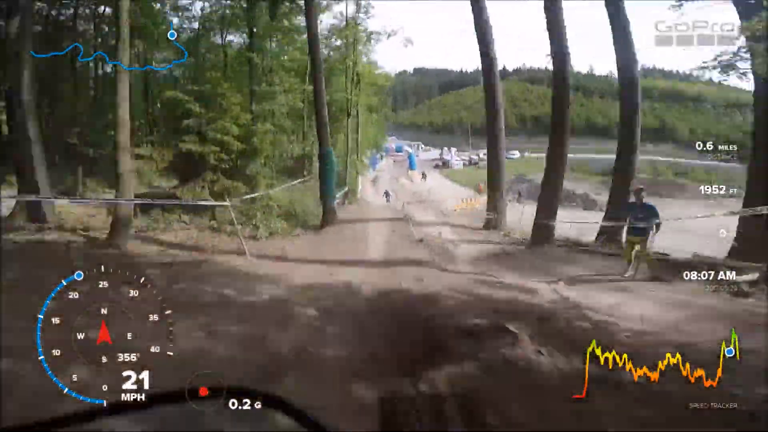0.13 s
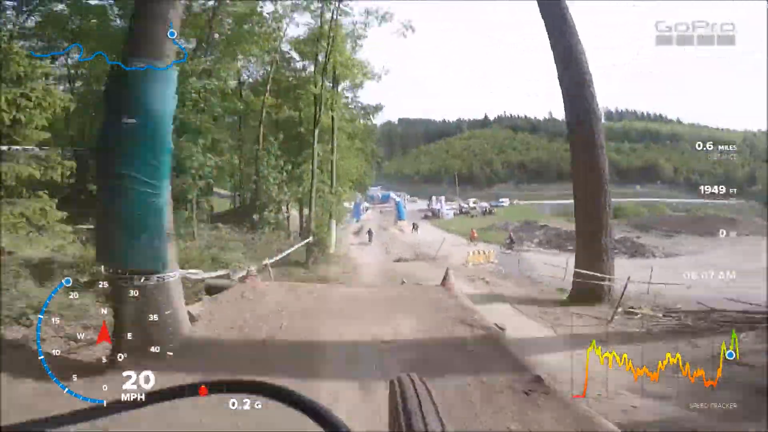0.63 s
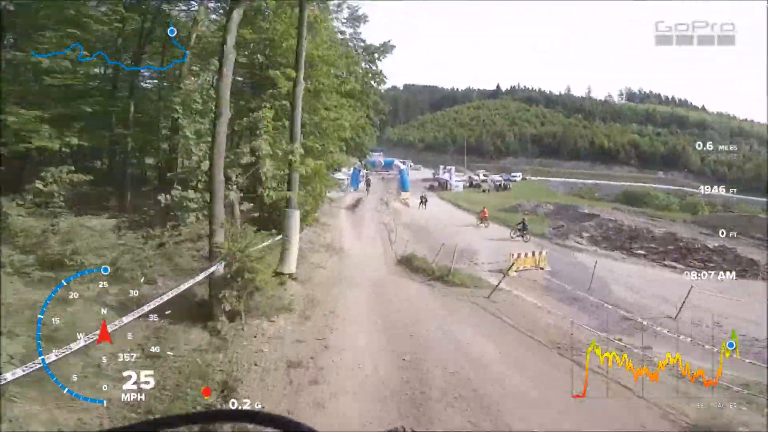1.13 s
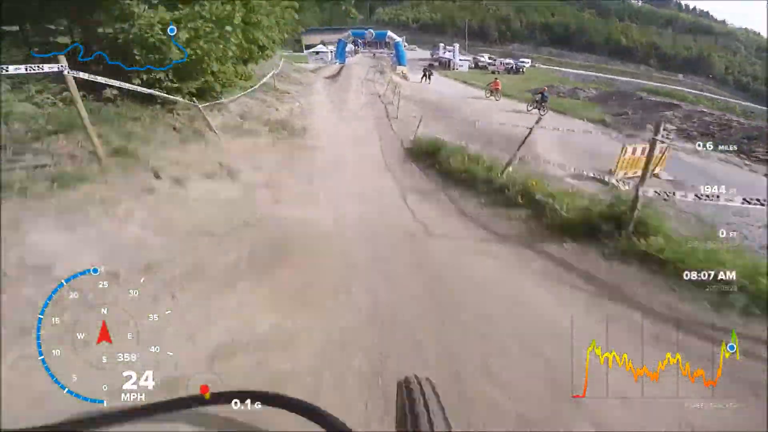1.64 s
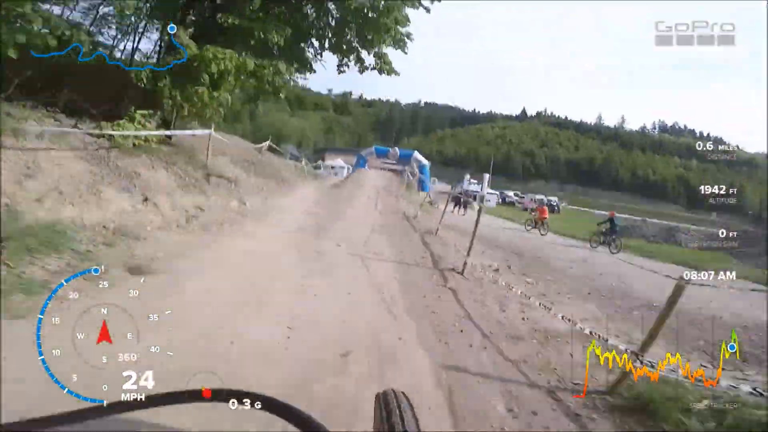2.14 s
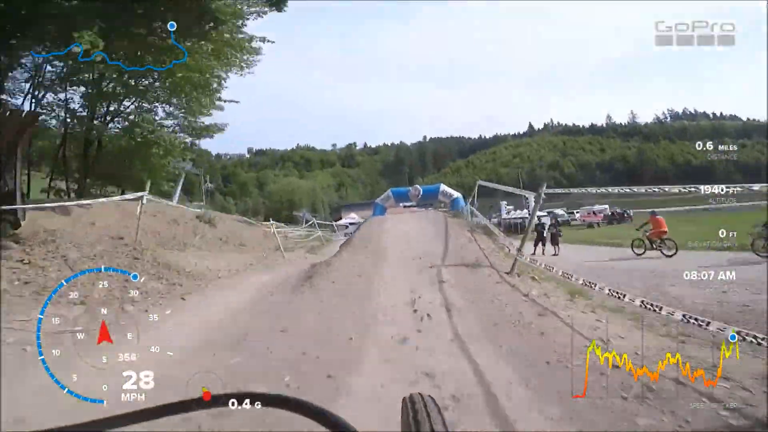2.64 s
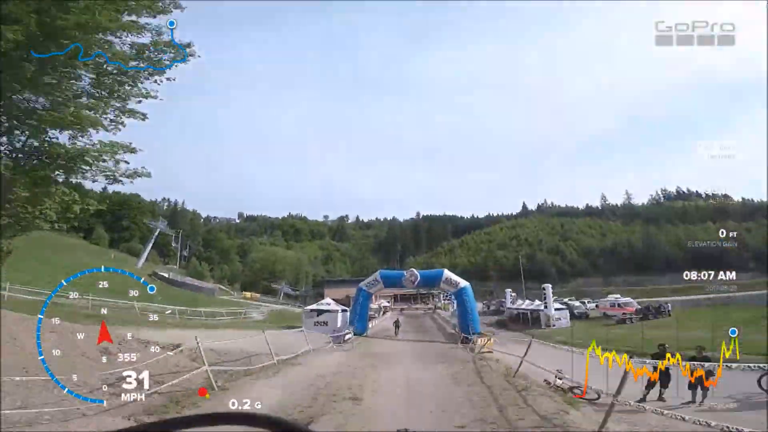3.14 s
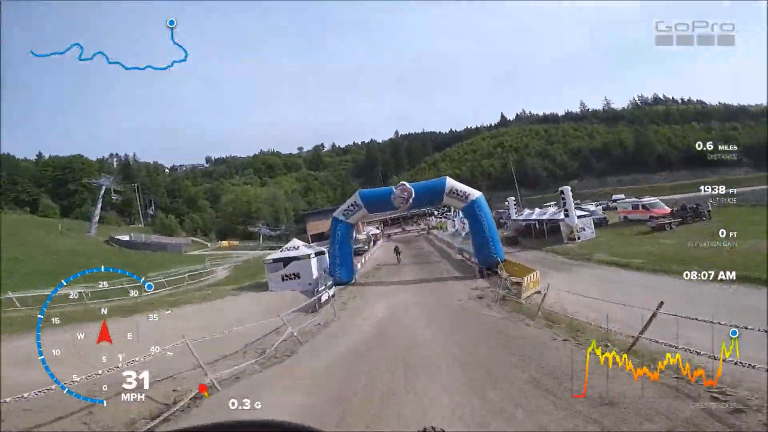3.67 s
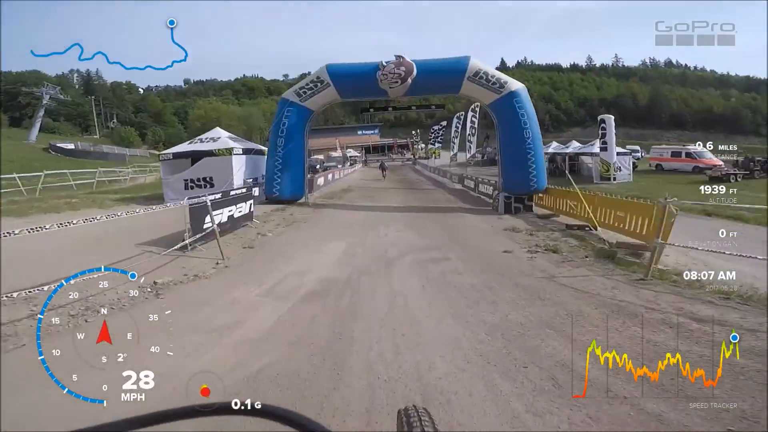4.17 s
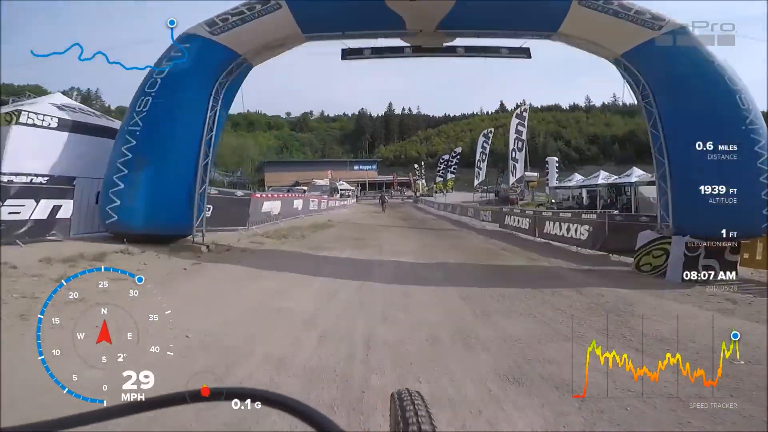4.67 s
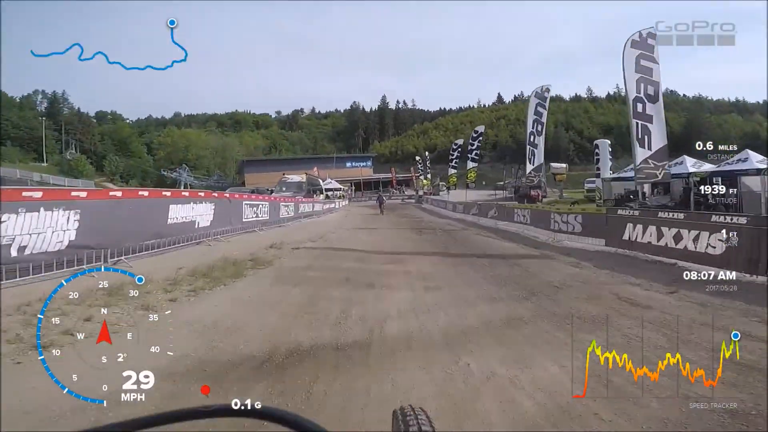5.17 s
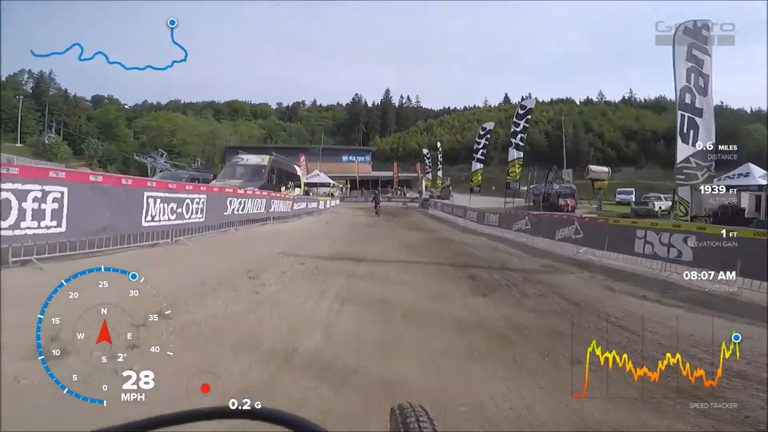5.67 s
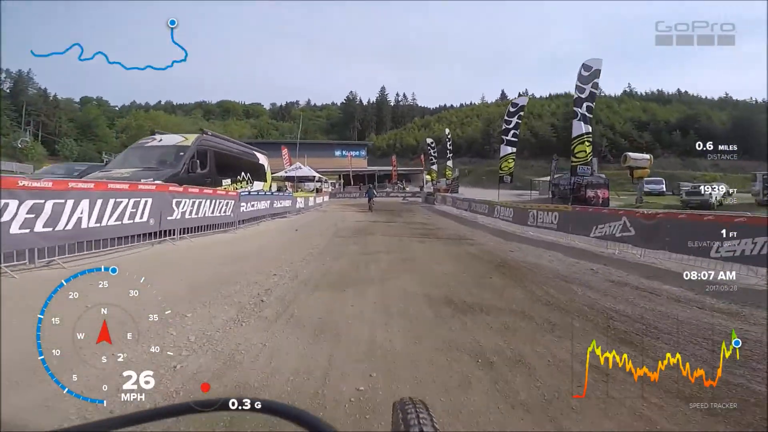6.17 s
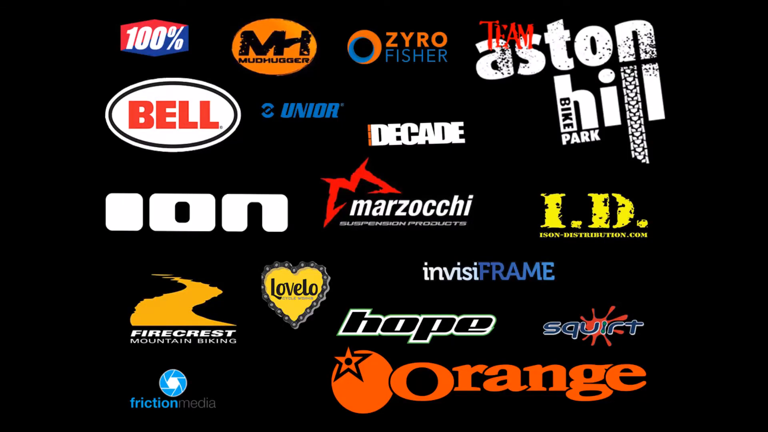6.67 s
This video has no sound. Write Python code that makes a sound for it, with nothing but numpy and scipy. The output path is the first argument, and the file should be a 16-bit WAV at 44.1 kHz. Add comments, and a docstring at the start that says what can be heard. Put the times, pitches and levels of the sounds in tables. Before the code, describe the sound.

A fast dirt-trail ride: lumpy bass wind roar, rumbling knobbly tyres, gravel chatter, ticks, two lighter airborne gaps with hard landings, abrupt click to silence.

```python
"""Deep bass buffeting leads, over drumming tyres, rattles, ticks and hissing air, on a fast dirt trail.
A small camera rides on a mountain bike: its microphone is in the wind, its housing shaken through the mount.
Noise swung around a moving centre makes the buffeting, filtered noise and clicks the tyres and air,
damped modes the blows. Twice the bike is in the air and the bass drops away; at the end the sound is cut off."""
import sys
import numpy as np
from scipy import signal
from scipy.io import wavfile
from scipy.ndimage import uniform_filter1d

SR = 44100
rng = np.random.default_rng(int(sys.argv[2]) if len(sys.argv) > 2 else 0)


def inscribe(sig):
    """Save sig as 16-bit PCM at rate SR to the path in sys.argv[1].

    A 1-D sig is mono; a 2-D sig holds one channel per row.
    Samples are clipped to [-1, 1] before scaling.
    """
    pcm = np.round(np.clip(np.atleast_2d(sig).T, -1, 1) * 32767)
    wavfile.write(sys.argv[1], SR, pcm.astype(np.int16))


def boost(x):
    """Linear amplitude factor 10**(x/20) for a level x in decibels (scalar or array-like)."""
    u = np.asarray(x, float) / 20
    return 10 ** u


N = 300175

# Levels in the tables are nominal: layer trims and the soft overload follow.
# Wheels off the trail: (take-off [s], landing [s])
JUMPS = [(1.303, 1.6), (3.42, 3.998)]
# The ride between jolts: (time [s], housing drumming [dB], overtones [dB], gravel chatter [dB], air hiss [dB])
ROLL = [(0, -26, -41, -43, -57), (0.4, -31, -40.5, -45, -53), (0.76, -32.5, -45, -47.5, -55.5),
        (0.93, -34, -43.5, -48.5, -53.5), (0.99, -34, -41.5, -52, -62.5), (1.17, -38, -49, -57, -58.5),
        (1.44, -36.5, -41, -50, -54.5), (1.59, -47.5, -49, -51, -53), (1.6, -32.5, -45.5, -43, -52.5),
        (1.87, -31, -43, -45, -52.5), (2.1, -31.5, -43, -45, -59), (2.4, -35, -43.5, -49.5, -59.5),
        (2.7, -31.5, -40, -44, -59), (3.1, -32.5, -44.5, -49.5, -59.5), (3.28, -34.5, -55, -59.5, -63),
        (3.46, -39.5, -45, -53, -60), (3.525, -36, -52, -53.5, -63), (3.56, -42, -50, -52, -59.5),
        (3.645, -52, -50.5, -54.5, -57), (3.68, -38.5, -47, -50.5, -57), (3.75, -45.5, -47, -52.5, -56.5),
        (3.985, -37, -45, -48.5, -53), (4.002, -30, -37, -38.5, -50.5), (4.3, -36.5, -41.5, -46, -56),
        (4.77, -33, -42, -47.5, -58), (5.0, -37, -42, -52, -56.5), (5.2, -27.5, -38.5, -50.5, -57.5),
        (5.38, -28, -38, -50.5, -59), (5.55, -31, -44.5, -48.5, -54.5), (6.15, -30.5, -42, -50.5, -56)]
# Roots, rocks and landings: (time of top [s], shake lift [dB], rattle lift [dB], fall [s])
JOLTS = [(0.065, 5.5, 4.5, 0.064), (0.22, 2.5, 1.5, 0.1), (0.339, 4.5, -6, 0.053), (0.474, 5.5, 9, .1),
         (0.6, 3, 9.5, 0.032), (0.702, 6.5, -3.5, 0.036), (0.882, 6, -2.5, .06), (1.615, 5, -4, 0.12),
         (1.7, 7.5, 9, 0.037), (1.735, 10.5, 18.5, .04), (1.755, 4.5, 3, 0.024), (1.938, 4.5, -2, 0.16),
         (2.11, 2.5, 3, .06), (2.22, 3.5, 4.5, 0.032), (2.499, 6, 13.5, 0.067), (2.884, 5.5, 12.5, .05),
         (3.017, 2, 10.5, 0.036), (3.414, 6.5, 10, 0.047), (4.015, 8.5, 8.5, 0.046), (4.06, 9, 12, 0.027),
         (4.224, 4, 8, 0.024), (4.366, 3.5, 4, 0.049), (4.585, 10, 20, 0.075), (4.693, 9, 18.5, 0.052),
         (4.845, 5.5, 12, 0.16), (5.07, 3, 6.5, 0.1), (5.402, 5.5, -1.5, 0.14), (5.505, 2.5, 4, 0.046),
         (5.62, 7, 18.5, 0.046), (5.677, 8, 18.5, 0.12), (5.892, 3.5, 13, 0.016), (6.144, 5.5, 12.5, 0.18)]
# Lift of each layer by the shake: layer: share [dB per dB]
SHAKE_SHARE = {"drum": 0.91, "overtones": 0.83, "chatter": 1, "hiss": 0.53}
# Treble layers at -32 dB of drumming and -47 dB of chatter: layer: (level [dB],
# slope with drumming, with chatter, with shake, with rattle [dB per dB])
TREBLE_LAWS = {"rattle": (-64.5, 0.84, 1.25, -1.41, 1.45), "grit": (-78.5, 1, 0.9, -0.8, 1)}

# Spectrum of the airstream hiss: (frequency [Hz], relative power density [dB])
AIR_COLOUR = [(880, -37), (1500, -5), (1870, -20.5), (2340, 5.5), (2750, -2.5), (3450, -14.5), (3760, -21),
              (4780, -5), (7360, -26), (9570, -65.5), (16200, -120)]
# Steady top of the hiss: (frequency [Hz], relative power density [dB])
THIN_AIR_COLOUR = [(5500, -27.5), (7000, -0.5), (7800, -0.5), (8500, 1), (9500, -6.5), (12000, -12.5),
                   (15500, -26), (17000, -79.5)]
# Breathy whistle of air over an edge: (time [s], level [dB], centre [Hz])
WHISTLE = [(0, -73.5, 4070), (0.6, -66, 4080), (0.81, -54.5, 3610), (1.18, -63, 4100), (1.38, -59, 3910),
           (1.45, -48.5, 4500), (1.5, -55, 4300), (1.8, -69, 3600), (1.92, -60, 4030), (2.15, -66.5, 3790),
           (2.79, -49.5, 4030), (3.18, -67.5, 3886), (3.47, -64, 3840), (3.53, -51.5, 3920),
           (3.6, -60, 3990), (3.95, -57, 3866), (4.22, -49, 3630), (4.36, -49, 4034), (4.86, -67, 4220),
           (5.4, -65, 3950), (5.62, -57.5, 3960), (6.1, -65, 3880)]

# Soft rumble left in the air, one list for each jump: (time [s], level [dB])
AIRBORNE = [
    [(1.3, -46), (1.326, -28.5), (1.376, -27), (1.524, -39), (1.568, -44), (1.592, -49), (1.603, -15)],
    [(3.42, -32), (3.438, -36), (3.606, -41), (3.76, -41.5), (3.79, -36), (3.872, -40), (3.904, -30),
     (3.928, -37), (3.968, -39), (4.01, -16)],
]
# Spectrum of that rumble: (frequency [Hz], relative power density [dB])
AIRBORNE_COLOUR = [(12, -45), (20, -23), (27, -10), (59, 2), (130, 0), (200, -13), (260, -28.5),
                   (440, -120)]

# Short scrapes of sand across the case: (time of top [s], level [dB], rise [s], fall [s])
SCRAPES = [(0.597, -45.5, .005, 0.011), (0.798, -56.5, 0.014, .008), (1.612, -53, 0.0085, 0.024),
           (1.657, -56, 0.0116, .015), (1.698, -52, .006, .012), (1.735, -44, 0.017, 0.016),
           (1.753, -43.5, .008, .012), (4.007, -46.5, .004, .025), (4.05, -46.5, .008, .02),
           (4.21, -48.5, 0.015, .012), (5.62, -46, .008, .012), (5.666, -39, 0.02, .012),
           (5.71, -56, .012, 0.022)]
# Spectrum of the scraping sand: (frequency [Hz], relative power density [dB])
SCRAPE_COLOUR = [(900, -30.5), (2000, -8), (3500, 4.5), (4600, -3.5), (5800, 4), (7500, -8.5), (9500, -29),
                 (13000, -37), (16500, -79)]

# Bumps that ring the housing: (time of top [s], peak [dB], frequency [Hz])
BUMPS = [(0.0848, -16.5, 385), (0.106, -16.5, 360), (0.2225, -21.5, 382), (0.274, -15.5, 365),
         (0.3081, -22.5, 324), (0.325, -17.5, 380), (0.3471, -13, 318.6), (0.4849, -15.5, 370),
         (0.5381, -14, 324), (0.6181, -19.5, 314), (0.6839, -23, 291), (0.7718, -21, 289),
         (0.8474, -17.5, 276), (0.9023, -12.5, 331), (1.0298, -19.5, 287), (1.6072, -10.5, 264),
         (1.6371, -18, 298), (1.6593, -20.5, 318), (1.7316, -29, 299), (1.8578, -18, 340),
         (1.961, -10.5, 347), (1.9718, -14.5, 386), (2.0067, -17, 349), (2.0933, -18, 295),
         (2.1105, -13.5, 303), (2.125, -18.5, 322), (2.2254, -17, 300), (2.3105, -22, 280.5),
         (2.4775, -15, 288), (2.5214, -17.5, 353), (2.5312, -9.5, 314), (2.5744, -15.0, 299),
         (2.6921, -17, 335), (2.8007, -16.5, 357), (2.888, -16, 338), (3.1835, -18.5, 251),
         (3.344, -21.5, 288), (4.0078, -13.5, 263), (4.023, -17, 250), (4.0424, -19, 403),
         (4.0653, -23.5, 357), (4.089, -13, 305), (4.3413, -19, 251), (4.3987, -21, 263.6),
         (4.4746, -23.5, 292), (4.5981, -14, 346), (4.6784, -10.5, 349), (4.8515, -17, 397),
         (4.8728, -20, 361), (4.9159, -22.5, 330), (4.9407, -21.5, 326), (5.0543, -14.5, 316.6),
         (5.0786, -13.5, 318), (5.1027, -14.5, 314), (5.1239, -19, 352), (5.151, -14, 321),
         (5.2162, -20, 303), (5.3203, -20.5, 340), (5.3865, -23.5, 323), (5.4167, -15.0, 280),
         (5.4635, -11, 317), (5.4814, -11.5, 334), (5.5062, -9, 348), (5.545, -13, 306.5),
         (5.6121, -13.5, 298), (5.6505, -21.5, 371), (5.6938, -11.5, 364.3), (5.7074, -19.5, 355),
         (5.7254, -19, 388), (5.8012, -19, 380), (5.8156, -18, 277), (5.8782, -12, 334.6),
         (5.9006, -18, 369), (5.9432, -16, 344), (6.0848, -14.5, 344.4), (6.102, -16, 350),
         (6.1185, -28.5, 325), (6.1424, -13, 287.7)]
# Housing modes rung a little by every bump: (frequency [Hz], level against the bump [dB])
HOUSING_MODES = [(256, -7.5), (402, -7)]
# Short clonks on the upper housing modes: (time of top [s], peak [dB], frequency [Hz])
CLONKS = [(0.0602, -20.5, 643), (0.1362, -27, 600), (0.1724, -27, 600), (0.2515, -22.5, 625),
          (0.2685, -20, 594), (0.3232, -25.5, 580), (0.471, -28.5, 576), (0.4905, -21, 564),
          (0.902, -31, 596), (0.9293, -28.5, 626), (1.6113, -22, 670), (1.6344, -27.5, 614),
          (1.6573, -20, 630), (1.6945, -25, 599), (1.71, -19.5, 610), (1.7298, -28.5, 677),
          (1.7522, -19, 675), (1.9087, -26, 630), (2.4866, -35, 654), (2.8869, -37.5, 583),
          (3.4008, -31.5, 620), (4.0042, -22.0, 665), (4.018, -17.5, 750), (4.0438, -22.0, 653),
          (4.0633, -17.5, 634), (4.5788, -20, 603), (4.6915, -31, 593), (4.8264, -25, 567),
          (4.8515, -33, 608), (5.5072, -25.5, 583), (5.6077, -29, 623), (5.6302, -20, 616),
          (5.6749, -26.5, 606), (5.6922, -24.5, 550), (5.7393, -24, 549), (6.087, -37.5, 605),
          (6.1061, -29.5, 551), (6.144, -28.5, 592)]
# Knocks of frame and chain: (time of top [s], peak [dB], frequency [Hz])
KNOCKS = [(0.04, -42, 1350), (0.06, -18.5, 1370), (0.085, -25, 1050), (0.109, -35, 1310),
          (0.123, -36, 1490), (0.134, -27, 1540), (0.146, -28.5, 1400), (0.1723, -24, 1750),
          (0.197, -30, 1910), (0.203, -32, 1170), (0.218, -28, 1890), (0.251, -26, 1530), (0.287, -19, 980),
          (0.301, -19.5, 1050), (0.323, -30, 1530), (0.347, -27, 1170), (0.387, -25.5, 1130),
          (0.393, -31, 1910), (0.432, -34, 1030), (0.4698, -28.5, 1980), (0.526, -39, 1290),
          (0.537, -29, 1510), (0.5926, -28.5, 1370), (0.648, -31, 1250), (0.667, -30, 1660),
          (0.701, -36, 1510), (0.721, -33, 1200), (0.789, -36, 1810), (0.828, -32, 1500),
          (0.8382, -31, 1480), (0.8595, -37, 1300), (0.88, -32, 1620), (0.93, -35, 1410),
          (1.128, -47, 2600), (1.6, -17.5, 1340), (1.615, -31, 1300), (1.633, -29, 1660),
          (1.662, -23.5, 1690), (1.683, -31, 1805), (1.697, -25, 2250), (1.71, -23, 1790),
          (1.729, -14.5, 1900), (1.7337, -18.5, 2650), (1.753, -15, 1990), (1.795, -32, 1840),
          (1.909, -27, 1140), (2.123, -26.5, 1710), (2.2203, -27, 940), (2.463, -32.5, 1900),
          (2.4775, -26.5, 1850), (2.516, -25.5, 1080), (2.528, -36, 2000), (2.537, -35, 1900),
          (2.573, -34, 1680), (2.582, -35, 1400), (2.672, -27.5, 1100), (2.717, -25, 1140),
          (2.789, -27, 1210), (2.831, -30, 1250), (2.867, -32, 935), (2.8826, -34, 1720),
          (2.903, -40, 1840), (2.976, -35, 1490), (3.0072, -29, 1470), (3.0334, -30, 1580),
          (3.067, -33, 1050), (3.082, -37, 1130), (3.398, -34, 1120), (4.004, -18, 1440), (4.02, -24, 1820),
          (4.0063, -25, 2620), (4.027, -18, 1000), (4.0275, -23, 2370), (4.0464, -37, 1540),
          (4.059, -16.5, 1730), (4.143, -26, 1770), (4.255, -26, 1670), (4.56, -23.5, 1160),
          (4.5775, -24, 1660), (4.59, -25, 1830), (4.677, -21, 1850), (4.692, -20, 1640),
          (4.7102, -26, 1000), (4.818, -25, 990), (4.8488, -26.5, 1230), (4.8705, -39, 1520),
          (4.915, -30.5, 1260), (5.048, -31, 1320), (5.077, -28.5, 1130), (5.134, -28, 950),
          (5.167, -45, 885), (5.1972, -41, 1100), (5.215, -32, 1150), (5.371, -46, 1350),
          (5.3865, -27, 1200), (5.406, -30, 1360), (5.4211, -26.5, 1260), (5.506, -33, 1000),
          (5.574, -34, 1210), (5.604, -20.5, 1310), (5.619, -38, 1270), (5.622, -23, 1230),
          (5.654, -30, 1180), (5.666, -36, 2300), (5.677, -33.5, 3080), (5.6836, -23, 1360),
          (5.707, -27.5, 1210), (5.725, -30.5, 1440), (5.734, -37, 3400), (5.791, -28.5, 980),
          (5.875, -41, 1180), (5.898, -26.5, 1070), (6.083, -31.5, 1290), (6.143, -30, 1230)]
# Ticks of a loose part in the mount: (time of top [s], peak [dB])
TICKS = [(0.041, -65), (0.06, -32), (0.0834, -44), (0.124, -33.5), (0.1323, -33), (0.18, -41), (0.199, -42),
         (0.238, -47), (0.2508, -41), (0.29, -44), (0.301, -39), (0.323, -43), (0.3455, -45), (0.367, -39),
         (0.456, -37), (0.479, -39), (0.5363, -39), (0.593, -35.5), (0.665, -51), (0.672, -44),
         (0.885, -54), (0.899, -54), (0.929, -48), (1.127, -53), (1.628, -41), (1.663, -41), (1.73, -45),
         (1.754, -43), (1.796, -49.5), (1.918, -37.5), (1.9872, -43), (2.0076, -36), (2.0469, -40.5),
         (2.0814, -44), (2.114, -45), (2.122, -45), (2.204, -52), (2.221, -44.5), (2.229, -52),
         (2.273, -55), (2.463, -45), (2.499, -48), (2.7297, -45), (2.853, -47), (2.872, -46), (2.884, -35),
         (3.0088, -44), (3.016, -42), (3.985, -46), (3.988, -43), (3.995, -31), (4.002, -36),
         (4.005, -36.5), (4.021, -35), (4.059, -33), (4.5805, -31), (4.587, -33.5), (4.674, -33),
         (4.679, -31), (4.853, -39), (4.916, -40), (5.076, -45), (5.425, -36.5), (5.503, -48), (5.618, -38),
         (5.629, -36), (5.6606, -37), (5.6664, -40), (5.697, -30), (5.734, -43), (5.883, -37)]
# Bright cracks of grit on the case: (time of top [s], peak [dB])
CRACKS = [(0.121, -34.5), (0.3235, -55), (0.346, -53), (0.3686, -44), (0.4079, -55), (0.483, -54),
          (1.627, -61.5), (1.6975, -53), (1.7075, -51), (1.718, -55), (1.729, -48.5), (1.753, -44),
          (2.0068, -55.5), (2.0464, -55), (2.0537, -50), (2.464, -54), (2.729, -53), (2.886, -58.5),
          (3.402, -52), (3.414, -52), (4.005, -42), (4.0462, -41), (4.2153, -60), (4.5853, -50),
          (4.679, -37), (4.8571, -55), (4.914, -51), (5.424, -49), (5.618, -36), (5.6691, -51),
          (5.696, -47), (5.8825, -47.5)]

# Spectrum of the drumming housing: (frequency [Hz], relative power density [dB])
HOUSING_COLOUR = [(88, -26), (150, -7.5), (205, -5.5), (254, -1), (397, -5), (480, -13.5), (620, -33.5),
                  (1060, -120)]
# Spectrum of its overtones: (frequency [Hz], relative power density [dB])
OVERTONE_COLOUR = [(280, -35.5), (480, -6.5), (522, -0.5), (579, 6.5), (640, 3.5), (690, 5.5), (728, -3),
                   (752, -11), (900, -15), (1170, -35.5), (1980, -120)]
# Spectrum of the gravel chatter: (frequency [Hz], relative power density [dB])
CHATTER_COLOUR = [(440, -26.5), (750, -0.5), (1010, -4.5), (1810, -7.5), (2260, -15), (3600, -20),
                  (4680, -36.5), (7920, -120)]
# Spectrum of the spraying grit: (frequency [Hz], relative power density [dB])
SPRAY_COLOUR = [(5500, -38.5), (7000, 7), (8600, 0), (10000, -5.5), (13000, -27), (15500, -25),
                (17000, -81.5)]

# The buffeting: (time [s], level [dB], base rate of the eddy swing [Hz],
# deep wide rumble against the swing [dB], lift of its upper bass [dB])
BUFFET = [(0, -19.5, 44, -0.5, -5.5), (0.4, -17.5, 47, 2, -3.5), (0.7, -18.5, 50, 0.5, -2.5),
          (0.95, -20, 40, 0.5, 2), (1.3, -19.5, 46.1, 4.5, 3), (1.7, -19, 45, 0.5, 2),
          (2.1, -18, 39.1, 2.5, -4.5), (2.75, -18, 37.6, 5.5, -4), (3.1, -19.5, 48, 0, 5.5),
          (4.1, -19.5, 49, 0.5, 4.5), (4.8, -17.5, 37.93, -2.5, 2.5), (5.3, -21, 49.9, 1.5, 3),
          (5.7, -20, 38, 2, 0), (6.15, -22, 40.9, 5.5, 1)]
# Spectrum of the wide rumble before that lift: (frequency [Hz], relative power density [dB])
BUFFET_COLOUR = [(7.1, -38), (12, -1), (27, -0.5), (44, -6.5), (62, -7), (80, -15), (105, -9), (168, -24.5),
                 (200, -31), (260, -64), (440, -120)]
# Gusts and lulls of the buffeting: (time of top [s], level change [dB])
GUSTS = [(0.07, 9), (0.968, 0.5), (1.751, 3), (2.34, -7), (2.426, -10), (3.222, -8.5), (3.312, -4.5),
         (4.03, 7.5), (4.679, 5), (4.729, -9.5), (5.02, -11), (5.669, -3.5), (5.79, -5), (6.07, 0.5),
         (6.161, -6)]

MOUNT_HZ = 5640  # high mode of the mount
FLUTTER_CAP, SIZE_CAP = 1.9, 3.2  # upper limits of the chance in gritty noise and stone sizes


def evened(x):
    """Scales to rms 1."""
    return x / np.sqrt(np.mean(x ** 2) + 1e-20)


def curve(rows, column):
    """One column of a table at every sample."""
    rows = np.array(rows)
    return np.interp(np.arange(N) / SR, rows[:, 0], rows[:, column])


def during(rows, ramp):
    """1 over the span of a table, 0 outside, with short ramps inside the span."""
    t = np.arange(N) / SR
    return np.clip(np.minimum(t - rows[0][0], rows[-1][0] - t) / ramp, 0, 1)


def peak(s, rise, fall):
    """A triangle of height 1 with its top at time s."""
    return np.interp(np.arange(N) / SR, [s - rise, s, s + fall], [0, 1, 0])


def wander(low_hz, high_hz):
    """Slow chance of rms 1: a sum of sines of random phase."""
    t = np.arange(0, N + 256, 256) / SR
    slow = sum(np.sin(2 * np.pi * (f * t + rng.random())) for f in np.geomspace(low_hz, high_hz, 24))
    return np.interp(np.arange(N) / SR, t, evened(slow))


def coloured(x, points):
    """Causal minimum-phase filter of the given spectrum, scaled to rms 1."""
    f, db = np.transpose(points)
    hz = np.fft.fftfreq(16384, 1 / SR)
    gain_db = np.maximum(np.interp(np.log(abs(hz) + 1), np.log(f + 1), db), -100)
    log_gain = np.log(10) / 20 * gain_db
    phase = -signal.hilbert(log_gain).imag
    taps = np.fft.ifft(np.exp(log_gain + 1j * phase)).real[:8192]
    return evened(signal.oaconvolve(x, taps)[:N])


def resonate(x, hz, width):
    """Shifts the curve hz down to zero, smooths, and shifts back: a resonance of gain 1."""
    turn = np.exp(2j * np.pi * np.cumsum(hz * np.ones(N)) / SR)
    r = np.exp(-np.pi * width / SR)
    return 2 * (turn * signal.lfilter([1 - r], [1, -r], x / turn)).real


def gritty(per_s, spread_db, share, flutter_db, flutter_s, rough=1):
    """Noise that flutters in level, mixed with scattered clicks of uneven size; rough 0 leaves it smooth."""
    noise, slow = rng.standard_normal(N), rng.standard_normal(N)
    size, chance = rng.exponential(1, N), rng.random(N)
    span = max(int(flutter_s * SR), 1)
    slow = evened(uniform_filter1d(uniform_filter1d(slow, span), span))
    flutter = boost(rough * flutter_db * np.clip(slow, -3, FLUTTER_CAP))
    clicks = np.sign(noise) * boost(spread_db * np.minimum(size, SIZE_CAP)) * (chance < per_s / SR)
    share = np.clip(share * rough, 0, 1)  # part of the power that is clicks
    return np.sqrt(1 - share) * evened(noise * flutter) + np.sqrt(share) * evened(clicks * flutter)


def add(mix, s, sound):
    """Adds a sound at a time."""
    part = mix[round(s * SR):][:len(sound)]
    part += sound[:len(part)]


def strike(mix, s, db, hz, t60, rise):
    """Adds one damped mode with a soft start, the top of its envelope at time s."""
    t = np.arange(int(t60 * SR) + 64) / SR
    shape = boost(-60 * t / t60) * (1 - np.exp(-t / rise)) ** 2
    at = max(round(s * SR) - shape.argmax(), 0)
    add(mix, at / SR, boost(db) * shape / shape.max() * np.sin(2 * np.pi * hz * t))


def grounded(ramp):
    """1 while the wheels are on the trail, 0 in the air."""
    return 1 - sum(during([[up], [down]], ramp) for up, down in JUMPS)


def jolted(column, rise):
    """Lift in dB by the strongest jolt at each moment; none in the air."""
    lift = np.zeros(N)
    for row in JOLTS:
        lift = np.maximum(lift, row[column] * peak(row[0], rise, row[3]))
    return lift * grounded(0.0094)


def ride_db():
    """Level of each layer from the rolling and the jolts."""
    shake, rattle = jolted(column=1, rise=0.055), jolted(column=2, rise=0.055)
    roll = {name: curve(ROLL, k + 1) for k, name in enumerate(SHAKE_SHARE)}
    drives = np.array([np.ones(N), roll["drum"] + 32, roll["chatter"] + 47, shake, rattle])
    db = {name: roll[name] + share * shake for name, share in SHAKE_SHARE.items()}
    treble = {name: np.array(law) @ drives for name, law in TREBLE_LAWS.items()}
    return {**db, **treble}


def air(hiss_db):
    """Hiss of the airstream, crunchy with flung sand when loud, and a fuzzy, fluttering whistle in it."""
    sandy = np.clip((hiss_db + 55.5) / 10.0, 0, 1) * grounded(.01) + 0.46
    hiss = boost(hiss_db - 3.5) * coloured(gritty(850.0, 2.0, 0.29, 7.0, 0.0091, sandy), AIR_COLOUR)
    hz = curve(WHISTLE, 2)
    breath = gritty(91.0, 2.5, .08, 5.0, 0.021)
    whistle = evened(resonate(resonate(breath, hz, 570.0), hz, 750.0))
    thin = boost(-84) * coloured(gritty(300.0, 3.0, 0.2, 2.5, 0.004), THIN_AIR_COLOUR)
    return hiss + thin + boost(curve(WHISTLE, 1) - 7.0) * whistle


def airborne():
    """What is left of the bass while the wheels are off the ground: a soft, filtered, uneven rumble."""
    rumble = coloured(gritty(27.0, 2.1, 0.28, 1.0, 0.088), AIRBORNE_COLOUR)
    return sum(boost(curve(rows, 1)) * during(rows, 0.0024) for rows in AIRBORNE) * rumble


def scrapes():
    """Dense grains of sand, swelling and fading at each scrape."""
    sand = coloured(gritty(1400.0, 3., .4, 2., .002), SCRAPE_COLOUR)
    return sand * sum(boost(db) * peak(s, rise, fall) for s, db, rise, fall in SCRAPES)


def puffs(rows, lift_db, low_hz, high_hz, fade):
    """A short burst of band noise at each blow, fading with time constant fade in seconds."""
    noise, out, k = rng.standard_normal((len(rows), 384)), np.zeros(N), np.arange(384)
    noise *= np.exp(-k / (fade * SR)) * np.minimum(k / 24, 1)  # rises over 24 samples
    band = signal.butter(4, [low_hz, high_hz], "bandpass", fs=SR, output="sos")
    noise = signal.sosfilt(band, noise)
    for (s, db, *_), puff in zip(rows, noise):
        add(out, s - .001, boost(db + lift_db) * puff)
    return out


def blows():
    """Bumps and clonks ring the housing, knocks are short and mid, ticks and cracks high; the last three puff."""
    out = np.zeros(N)
    for s, db, hz in BUMPS:
        for ring_hz, ring_db in [(hz, -3.)] + HOUSING_MODES:
            strike(out, s, db + ring_db, ring_hz, t60=0.025, rise=0.0046)
    for s, db, hz in CLONKS:
        strike(out, s, db, hz, t60=0.016, rise=0.0015)
    for s, db, hz in KNOCKS:
        strike(out, s, db - 0.5, hz, t60=0.0084, rise=0.00046)
        strike(out, s, db - 14.0, hz * 1.65, t60=0.0045, rise=0.0013)  # a second, higher mode
    tick_chance = np.cos(np.pi * rng.random(len(TICKS)))
    for (s, db), chance in zip(TICKS, tick_chance):
        strike(out, s, db - .6, MOUNT_HZ * (1 + 0.063 * chance), t60=0.0091, rise=0.00033)
    crack_hz = rng.uniform(7000, 9600, len(CRACKS))
    for (s, db), hz in zip(CRACKS, crack_hz):
        strike(out, s, db - 6.0, hz, t60=0.0044, rise=0.0005)
    out += puffs(KNOCKS, 2.0, 500., 4000.0, fade=0.00059)
    out += puffs(CRACKS, 2.2, 4100.0, 14000.0, fade=0.00099)
    return out + puffs(TICKS, -2.5, 1800.0, 7000.0, fade=0.0017)


def stones():
    """Small stones and chain links, each a short ring at one of 16 pitches, weaker when higher."""
    size = boost(4.0 * np.minimum(rng.exponential(1, N), SIZE_CAP)) * (rng.random(N) < 260. / SR)
    kind, out = rng.integers(0, 16, N), np.zeros(N)
    for k, hz in enumerate(np.geomspace(900, 3400, 16)):
        one = np.zeros(1024)
        strike(one, .001, -7. * np.log2(hz / 900), hz, t60=0.019, rise=0.00034)
        out += signal.oaconvolve(size * (kind == k), one)[:N]
    return evened(out)


def tyres(db):
    """Knobs and stones shake the mount: low drumming, mid chatter, a fine rattle on the mount's high mode, grit."""
    rough = np.clip((db["chatter"] + 56.0) / 11.9, 0, 1) * grounded(0.0059)  # harder ride, grainier sound
    shake = gritty(120., 2.2, 0.14, 2.6, 0.0043, rough)

    drum = coloured(shake, HOUSING_COLOUR)
    calm = evened(resonate(drum, 276.4, 40.0) + 0.51 * drum)  # gently shaken, the lowest mode stands out
    drum = boost(-1.5) * rough * drum + np.sqrt(1 - rough ** 2) * calm
    drum = boost(db["drum"]) * drum / (1 + 0.15 * rough * (1 - rough))

    upper_shake = shake + 0.69 * gritty(220.0, 7.9, 0.17, 2.5, 0.0027, rough)
    upper = boost(db["overtones"]) * coloured(upper_shake, OVERTONE_COLOUR)
    high_mode = boost(0.5) * resonate(resonate(upper, 744.0, 110.0), 701.0, 160.0)
    low_mode = boost(3.5) * resonate(upper, 430.0, 120.0)
    calm = 0.22 * upper + high_mode + low_mode  # two modes stand out
    upper = boost(-1.0) * rough * upper + (1 - rough) * calm

    chatter = coloured(gritty(380.0, 2.9, 0.32, 3.6, 0.011, rough), CHATTER_COLOUR)
    calm = chatter + boost(-3.5) * resonate(chatter, 1340.0, 260.0)  # one broad mode of the frame
    chatter = rough * chatter + (1 - rough) * calm + 0.67 * rough * stones()

    grit = gritty(500.0, 4.0, 0.45, 3.4, 0.009)
    fine = evened(resonate(resonate(grit, MOUNT_HZ, 620), MOUNT_HZ, 1300.0))
    high = boost(db["rattle"]) * fine + boost(db["grit"]) * coloured(grit, SPRAY_COLOUR)
    return drum + upper + boost(db["chatter"]) * chatter + high


def buffet():
    """Eddies shake the diaphragm: a lumpy swing around a moving centre, its height evened by a bass limiter."""
    wide, drive = coloured(rng.standard_normal(N), BUFFET_COLOUR), rng.standard_normal(N)
    deep = signal.sosfiltfilt(signal.butter(2, 62, fs=SR, output="sos"), wide)
    wide = deep + boost(curve(BUFFET, 4)) * (wide - deep)

    take_off = sum(0.43 * peak(up, 0.088, .01) for up, _ in JUMPS)  # eddies quicken on the ramp of a jump
    hz = curve(BUFFET, 2) * (1 + 0.069 * wander(1.0, 5.7) + take_off)
    eddies = evened(resonate(resonate(drive, hz, 23.0), hz, 24.0))
    swing = boost(curve(BUFFET, 3)) * wide + eddies

    height = uniform_filter1d(abs(signal.hilbert(swing)), 700)
    swing = evened(swing / (height + 0.084) ** 0.77)
    gusts_db = sum(db * peak(s, 0.032, 0.032) for s, db in GUSTS)
    level_db = curve(BUFFET, 1) + 0.5 * wander(1.9, 12.0) + gusts_db
    return grounded(0.0012) * boost(level_db) * evened(np.tanh(0.11 * swing))


def scene():
    """All that reaches the microphone."""
    db = ride_db()
    mix = buffet() + airborne() + tyres(db) + air(db["hiss"]) + blows() + scrapes()
    return mix[None]


def band_limit(x):
    """A steep low-pass at the top of the band."""
    return signal.sosfilt(signal.butter(12, 15700, fs=SR, output="sos"), x)


def record(dry):
    """Soft overload, then a hard cut: the wave is pushed towards a fixed value first, a faint trace dies after."""
    t, cut_s = np.arange(N) / SR, 6.1537
    held = .41 * np.tanh(1.1 * dry / .41)
    last = np.clip(1 - (cut_s - t) / .008, 0, 1)  # 0 to 1 over the last 8 ms
    held = held * (1 - .75 * last) + .16 * np.sin(np.pi / 2 * last)  # the step down at the cut clicks
    trace = boost(-27.) * dry * np.clip(1 - (t - cut_s) / .036, 0, 1)
    finished = np.where(t < cut_s, held, trace)
    return band_limit(finished)


dry = scene()
out = record(dry)
inscribe(out)
```